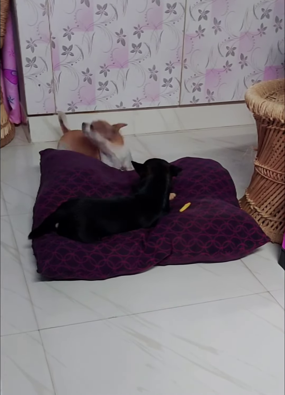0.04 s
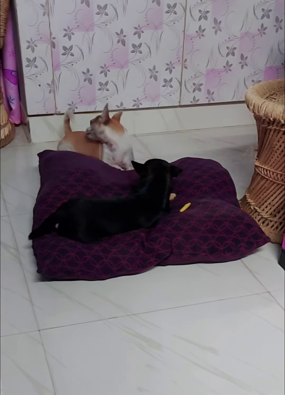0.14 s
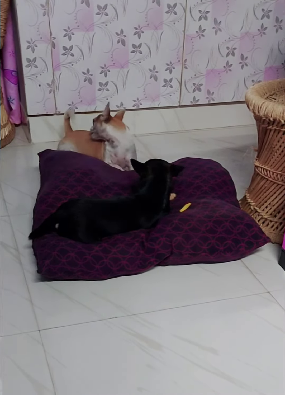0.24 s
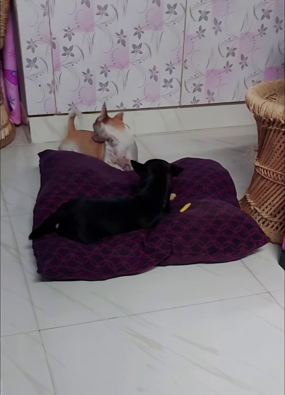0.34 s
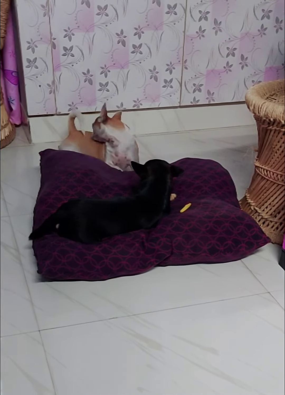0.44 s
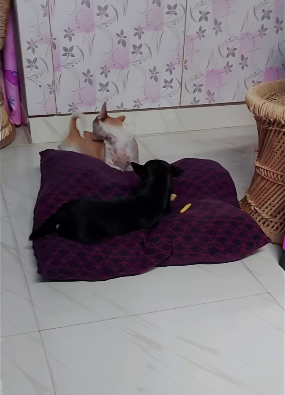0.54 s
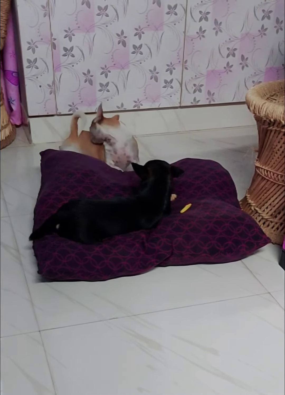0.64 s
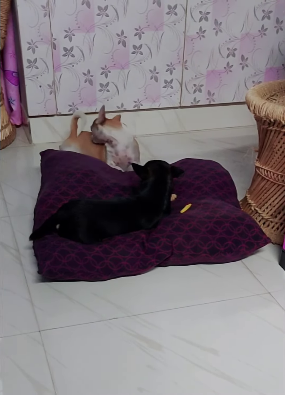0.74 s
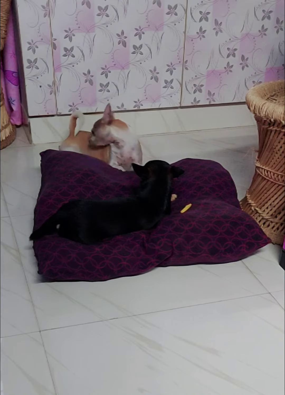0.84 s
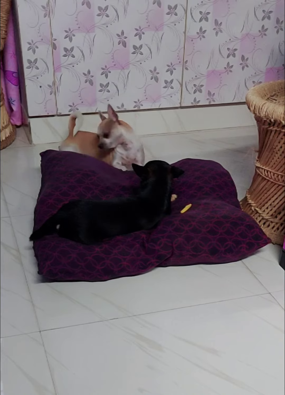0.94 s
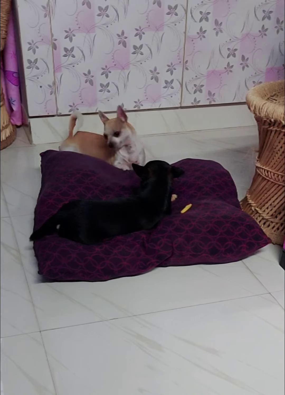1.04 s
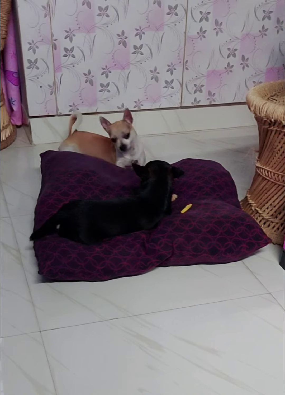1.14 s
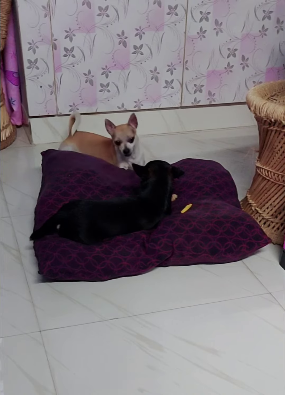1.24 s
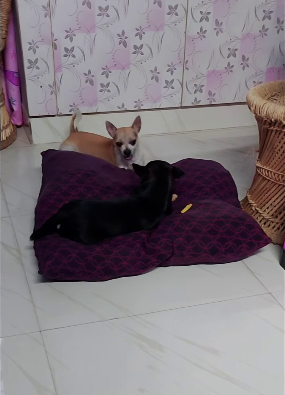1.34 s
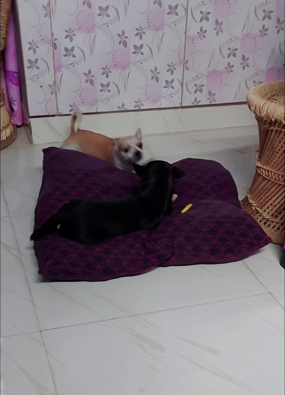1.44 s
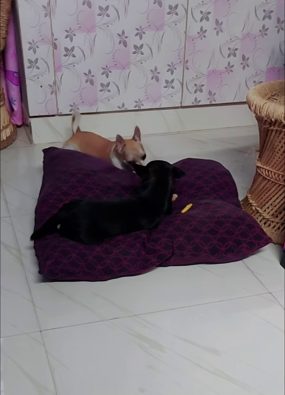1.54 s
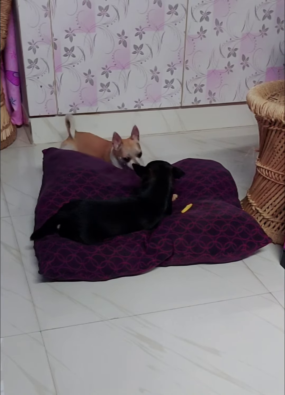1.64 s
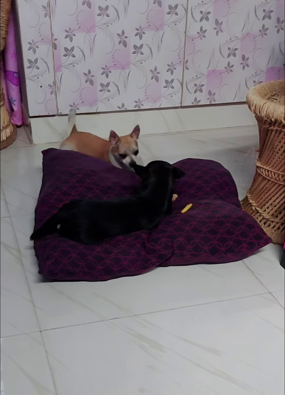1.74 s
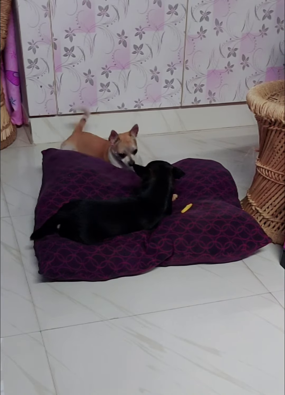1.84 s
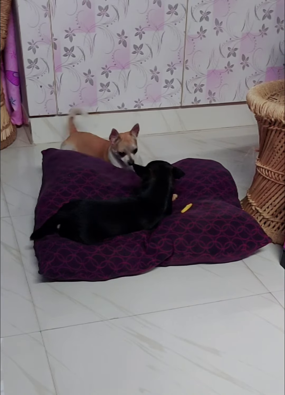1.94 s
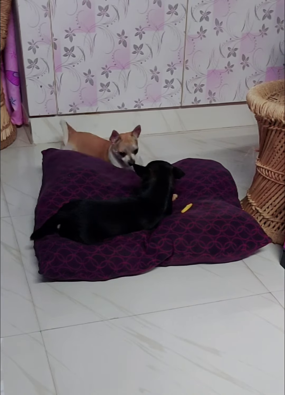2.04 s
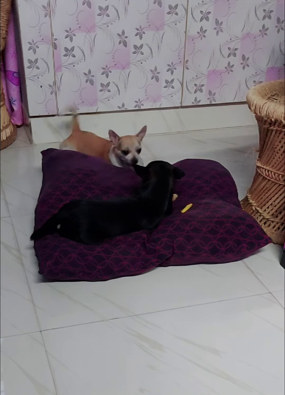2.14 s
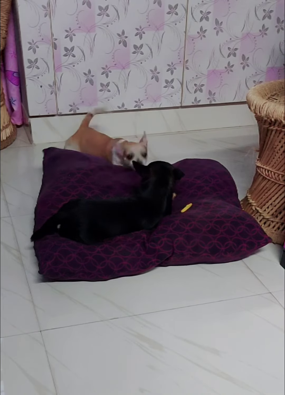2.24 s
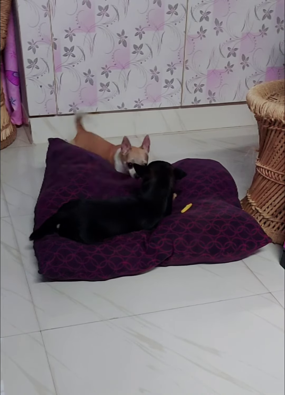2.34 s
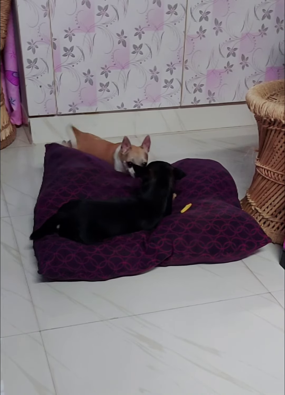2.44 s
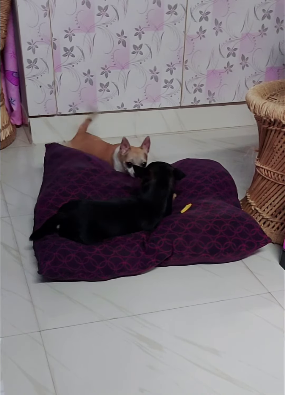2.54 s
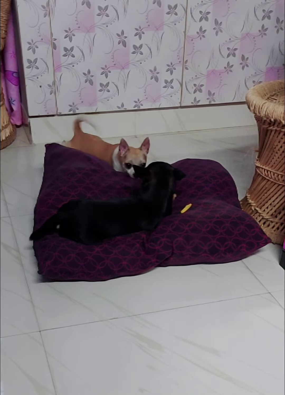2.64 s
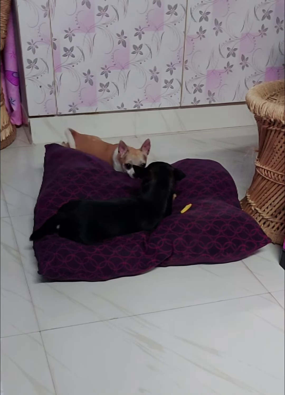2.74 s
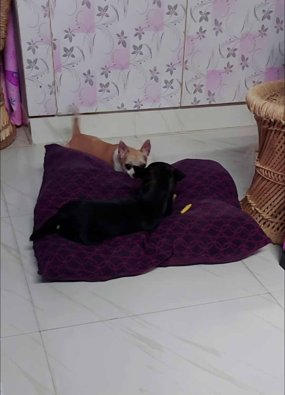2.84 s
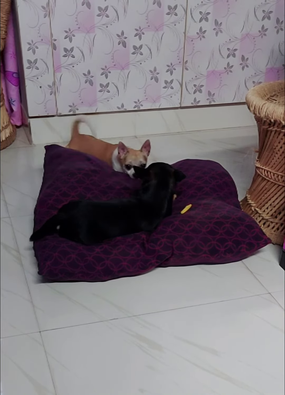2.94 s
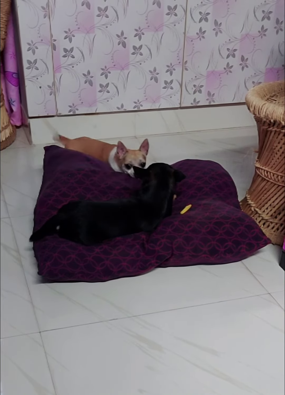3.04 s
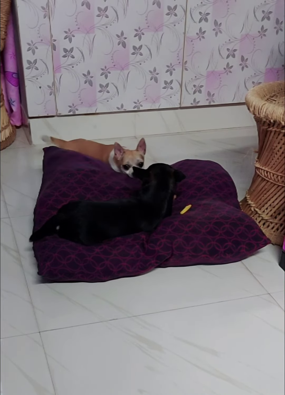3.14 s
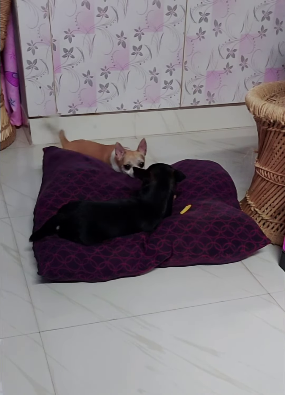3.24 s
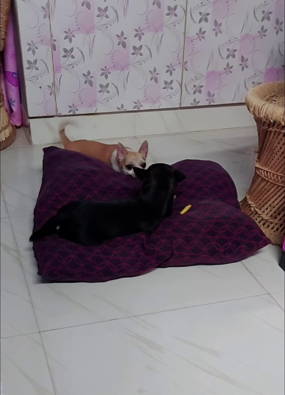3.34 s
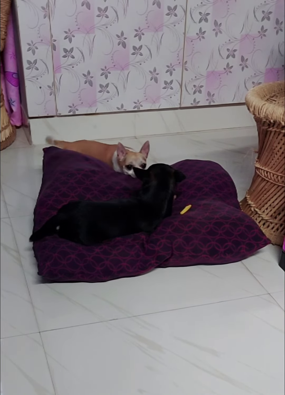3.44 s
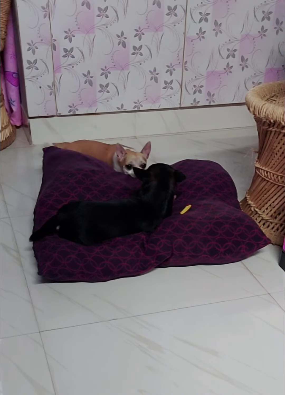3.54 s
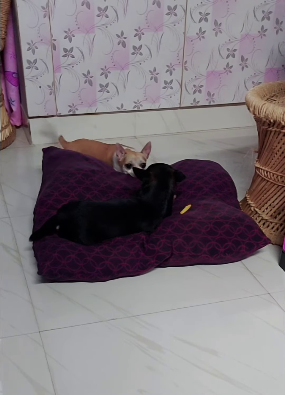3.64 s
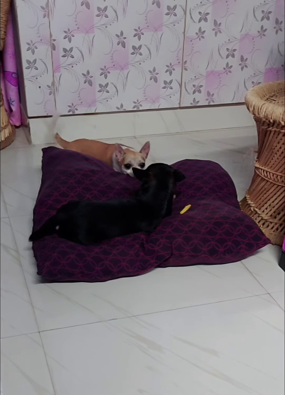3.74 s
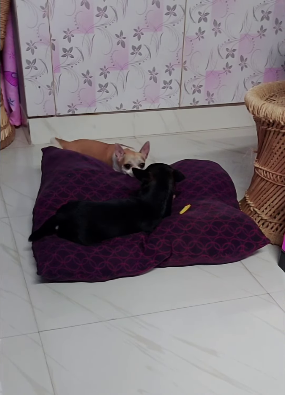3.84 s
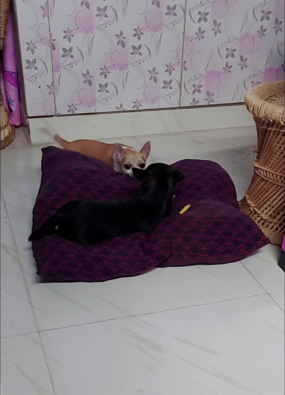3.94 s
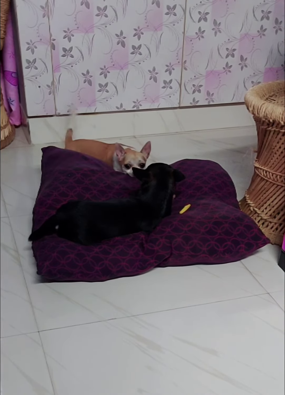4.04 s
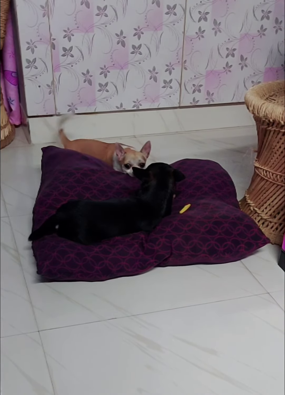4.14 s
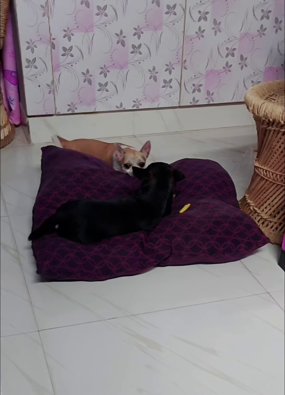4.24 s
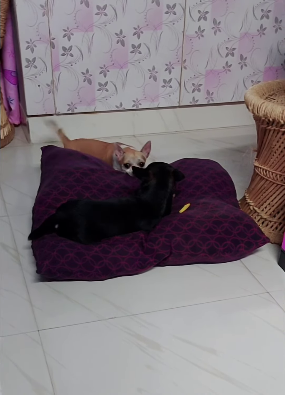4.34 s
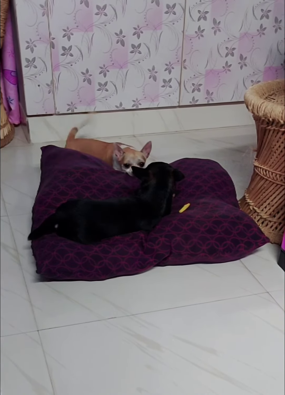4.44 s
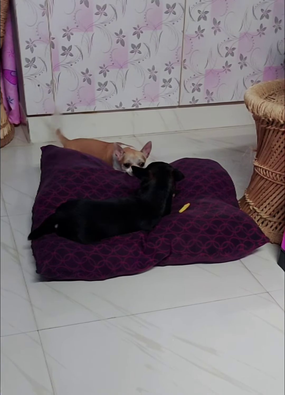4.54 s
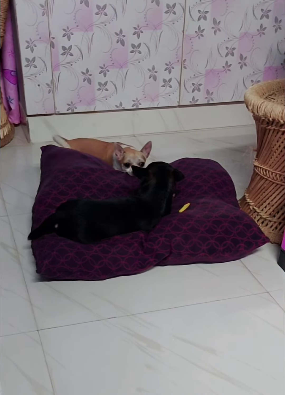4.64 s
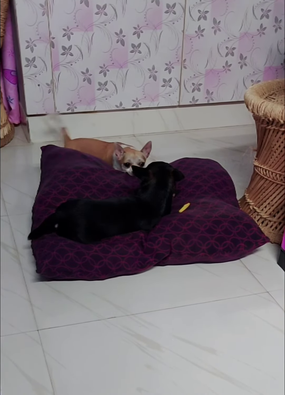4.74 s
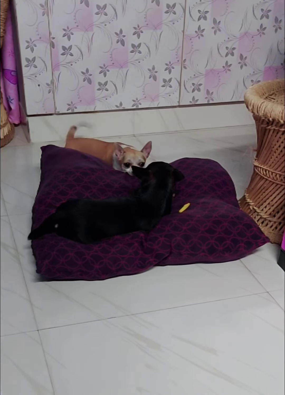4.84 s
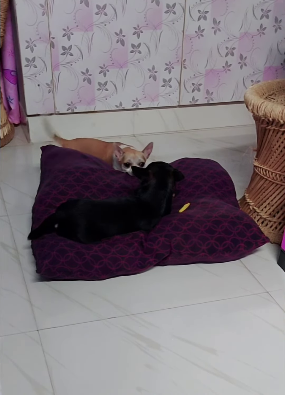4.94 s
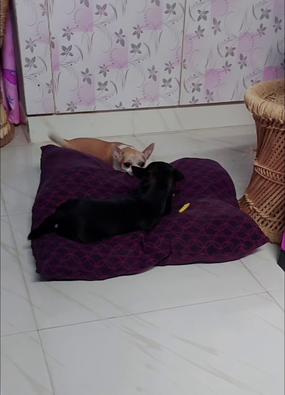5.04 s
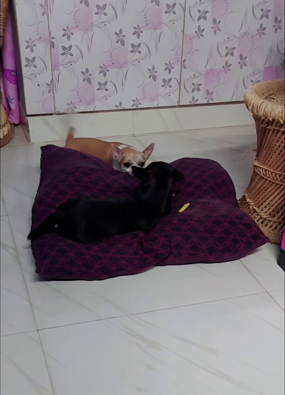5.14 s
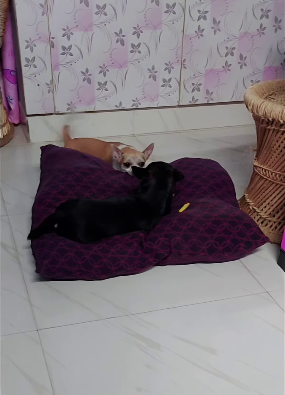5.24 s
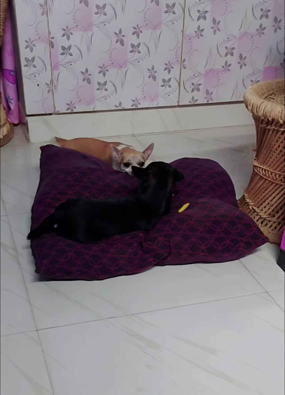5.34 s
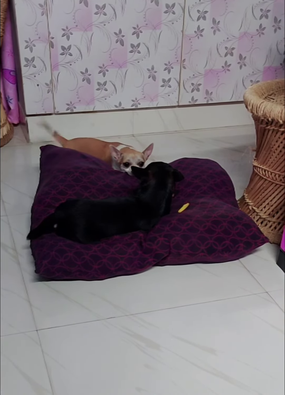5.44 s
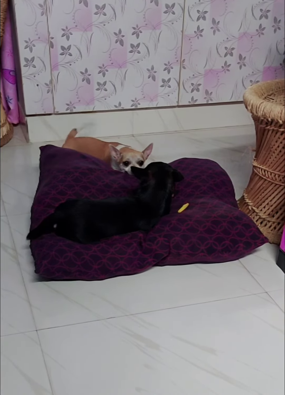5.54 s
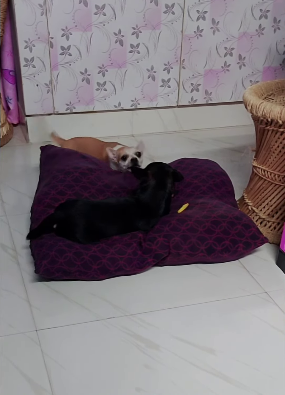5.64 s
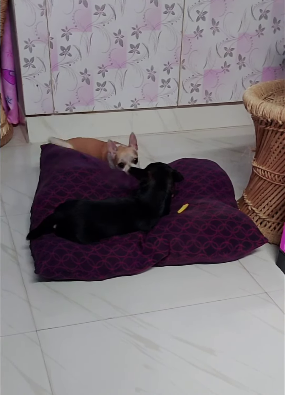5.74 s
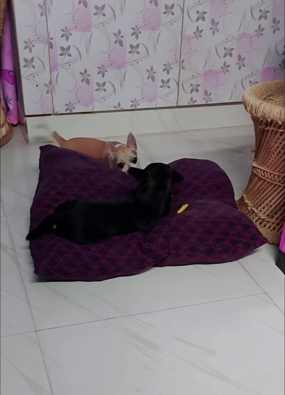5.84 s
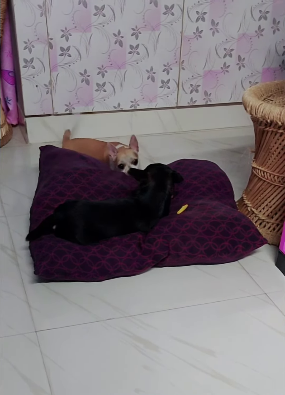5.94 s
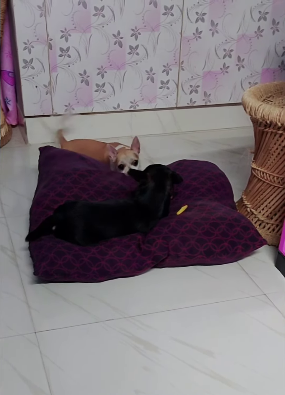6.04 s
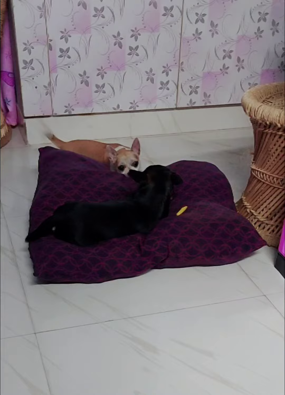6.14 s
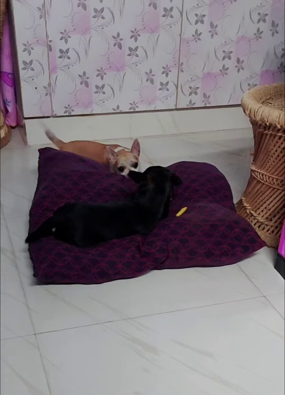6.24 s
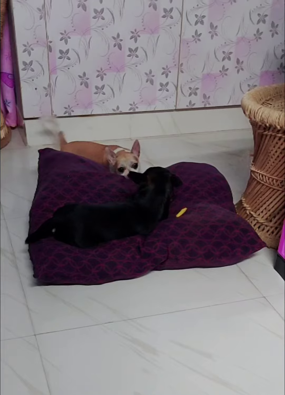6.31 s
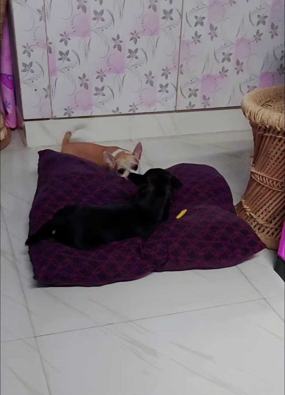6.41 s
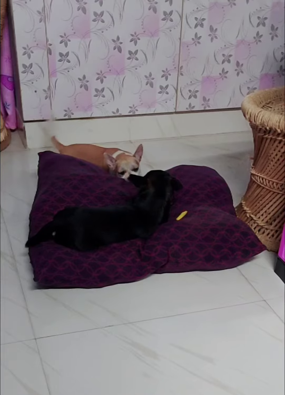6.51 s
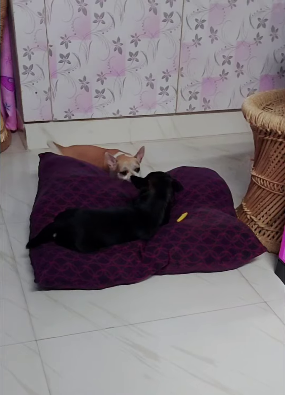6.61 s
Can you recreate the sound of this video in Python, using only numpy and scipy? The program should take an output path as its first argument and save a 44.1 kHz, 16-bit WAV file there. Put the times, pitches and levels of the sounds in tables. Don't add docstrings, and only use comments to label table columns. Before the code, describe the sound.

Over a steady whirring fan and low wind rumble, a little dog yaps shrilly three separate times, each yap ringing briefly off hard tiles.

```python
import sys
import numpy as np
from scipy import signal
from scipy.fft import rfft, irfft
from scipy.io import wavfile
from scipy.ndimage import uniform_filter1d, minimum_filter1d

SR = 44100
rng = np.random.default_rng(int(sys.argv[2]) if len(sys.argv) > 2 else 0)


def log_audio(samples):
    frames = np.atleast_2d(samples).T
    limited = np.clip(frames, -1, 1)
    pcm = np.round(limited * 32767).astype(np.int16)
    wavfile.write(sys.argv[1], SR, pcm)


def ratio_of_db(decibels):
    return 10 ** (np.asarray(decibels, float) / 20)


N = 294318
LONGEST = 8192
DUCK_S = 0.065

# (time [s], gain change [dB])
GAIN_STEPS = [
    (1.52, -5.5),
    (2.3, -2),
    (5.72, -2),
]


def rms_one(x):
    return x / np.sqrt(np.mean(x ** 2) + 1e-20)


def in_time(rows, at):
    s, *columns = np.transpose(rows)
    return [np.interp(at / SR, s, c) for c in columns]


def at_hz(points, hz):
    table_hz, value = np.array(points).T
    return np.interp(np.log(np.maximum(hz, 1)), np.log(table_hz), value)


def coloured(points, size):
    hz = np.fft.rfftfreq(size, 1 / SR)
    white = rfft(rng.standard_normal(size))
    return rms_one(irfft(white * ratio_of_db(at_hz(points, hz)), size))


def drift(rate_hz, size):
    settle = 20000
    r = np.exp(-2 * np.pi * rate_hz / SR)
    wander = signal.lfilter([1], [1, -2 * r, r * r], rng.standard_normal(size + settle))
    return rms_one(wander[settle:])


def yaps():
    # (time [s], pitch [Hz], level [dB])
    notes_sung = [
        [(1.449, 1760, -26.5), (1.472, 2223, -19.5), (1.495, 2470, -26.5)],
        [(1.474, 1480, -19.5), (1.49, 1544, -7.5), (1.497, 1572, -3.5), (1.512, 1560, -8.5)],
        [(1.503, 1766, -15), (1.524, 2040, -7.5), (1.546, 1980, -21)],
        [(2.228, 1470, -24), (2.246, 1588, -18.5), (2.2555, 1617, 2), (2.261, 1727, -10), (2.295, 1840, -23)],
        [(2.254, 2236, -26), (2.266, 2267, -7.5), (2.287, 2244, -4.5), (2.302, 2196, -8.5), (2.314, 1713, -8)],
        [(2.31, 1454, -14.5), (2.322, 1351, -14.5), (2.338, 1233, -21.5), (2.349, 1030, -27)],
        [(5.615, 1330, -44), (5.648, 1309, -38.5), (5.68, 1558, -8.5), (5.705, 1577, -3.5), (5.73, 1526, -14),
         (5.75, 1350, -16)],
        [(5.744, 1450, -15.5), (5.76, 1250, -38), (5.777, 984, -32)],
    ]
    roughness = [.45, .04, .1, .12, .3, .35, .03, .3]
    # (mouth opening on overtones [dB], half lines of strong-weak cycles [dB])
    registers = [(-18, -10.5), (-9, -56), (-1.5, -31), (-12, -39), (7, -59), (-11, -15), (-2.5, -60),
                 (7, -19)]
    # (multiple [x pitch], level [dB])
    overtones = [(1, 6), (2, -19.5), (3, -20.5), (4, -32), (5, -48.5), (6, -41), (7, -38.5), (8, -35),
                 (9, -37), (10, -29.5)]
    # (frequency [Hz], gain [dB])
    mouth = [(2500, 3), (3300, 3), (4700, -3), (5400, -8), (7000, -10.5), (8300, 11.5), (10000, -0.5),
             (13000, -1)]
    # (frequency [Hz], level [dB per Hz])
    rasp_colour = [(800, -38.5), (1200, -25), (2300, -8), (3000, -3), (4600, -13.5), (5100, -34),
                   (5700, -29), (7500, -35), (9000, -20), (10500, -29), (12500, -34), (15500, -27)]
    voice_db = -2.5
    soft_opens = 0.72

    out = np.zeros(N)
    for note, rough, (open_db, half_db) in zip(notes_sung, roughness, registers):
        at = np.arange(round(note[0][0] * SR), round(note[-1][0] * SR))
        size = len(at)
        hz, level_db = in_time(note, at)
        mouth_db = open_db + soft_opens * (level_db.max() - level_db)
        jitter = 1 + 0.08 * rough * drift(200, LONGEST)[:size]
        phase = 2 * np.pi * np.cumsum(hz * jitter) / SR
        effort_db = 0.5 * np.minimum(level_db + 3, 0) - 25 * rough

        tone = np.zeros(size)
        for k, db in overtones:
            harmonic_db = db + np.zeros(size)
            if k > 1:
                harmonic_db += at_hz(mouth, k * hz)
            if 1 < k < 4:
                harmonic_db += mouth_db
            if k > 2:
                harmonic_db += effort_db
            tone += ratio_of_db(harmonic_db) * np.sin(k * phase) * (k * hz < SR / 2)

        half_lines = ratio_of_db(0.5) * np.sin(phase / 2) + np.sin(3 * phase / 2) + ratio_of_db(-13) * np.sin(7 * phase / 2)
        tone += ratio_of_db(half_db) * half_lines
        tone *= ratio_of_db(9.7 * rough * drift(130, LONGEST)[:size])

        rasp = coloured(rasp_colour, LONGEST)[:size]
        rasp *= 1 + 0.8 * np.sin(phase)
        rasp *= ratio_of_db(5 * drift(150, LONGEST)[:size])
        fade = signal.windows.tukey(size, 0.15)
        out[at] += ratio_of_db(level_db + voice_db) * fade * (np.sqrt(2) * tone + 0.5 * rough * rasp)
    return signal.sosfilt(signal.butter(8, 900, "high", fs=SR, output="sos"), out)


def squeaks():
    # (time [s], length [s], level [dB])
    squeak_events = [
        (5.02, 0.055, -89),
        (5.193, 0.092, -86.5),
    ]
    # (frequency [Hz], level [dB])
    partials = [(5880, 6), (8800, -6), (13450, 2)]
    out = np.zeros(N)
    for start, length, level_db in squeak_events:
        s = np.arange(round(length * 1.5 * SR)) / SR
        shape = np.minimum(s / 0.011, 1) * ratio_of_db(-14 * (s / length) ** 2)
        tones = 0
        for hz, db in partials:
            waver_db = 3 * drift(40, LONGEST)[:len(s)]
            tones = tones + ratio_of_db(db + waver_db) * np.sin(2 * np.pi * hz * s)
        out[round(start * SR):][:len(s)] += ratio_of_db(level_db + 15) * shape * tones
    return out


def rustles():
    # (time [s], peak level [dB], length [s])
    scuffs = [
        (.28, -61, .05),
        (1.25, -50.5, 0.048),
        (3.067, -61, .06),
        (3.2, -65, .08),
        (3.43, -56, .04),
        (4.72, -67, .02),
        (4.793, -62, .04),
    ]
    shape = 0
    for at, db, length in scuffs:
        since = np.maximum(np.arange(N) / SR - at, 0)
        shape = shape + ratio_of_db(db - 25 * since / length) * np.minimum(since / 0.0066, 1)
    cloth = [(600, -24), (1500, -5), (4500, 0.5), (6500, -3), (9000, -19), (15000, -12.5)]   # (Hz, dB)
    return shape * coloured(cloth, N)


def knock():
    s = np.arange(N) / SR
    rustle = coloured([(300, -19), (2000, 5.5), (4000, -6), (9000, -8.5), (15000, -31)], N)
    hollow = coloured([(340, -60), (420, -5.5), (480, 1), (560, -46.5)], N)
    ring_shape = np.exp(-(s / 0.058) ** 2) * np.minimum(s / 0.016 + 0.94, 1)
    return ratio_of_db(-39.5) * rustle * ratio_of_db(-60 * s / 0.41), ratio_of_db(-30) * hollow * ring_shape


def room(x):
    # (frequency [Hz], time to fall 60 dB [s])
    decay_times = [(1000, 0.3), (4000, 0.27), (8000, 0.27), (15000, 0.26)]
    room_db, near_db, shadow_db = -6.5, -10, -1.5
    dog_lag = 11
    early_db, early_s = 7.5, 0.0071

    s = np.arange(round(0.6 * SR)) / SR
    white = rng.standard_normal((2, len(s)))
    cloud = 0
    for low in 250 * 2.0 ** np.arange(6):
        octave = signal.butter(2, [low, 2 * low], "band", fs=SR, output="sos")
        cloud = cloud + signal.sosfilt(octave, white) * ratio_of_db(-60 * s / at_hz(decay_times, 1.3 * low))
    cloud = cloud * np.clip((s - 0.0005) / 0.0021, 0, 1) * ratio_of_db(early_db * np.exp(-s / early_s))
    cloud /= np.sqrt(np.sum(cloud ** 2, axis=1, keepdims=True))

    paths = ratio_of_db(room_db) * np.roll(cloud, dog_lag, axis=1)
    paths[[0, 1], [dog_lag, 0]] += ratio_of_db([near_db, near_db + shadow_db])
    colour = rfft(paths)
    broad = np.sqrt(uniform_filter1d(np.abs(colour) ** 2, size=100))
    paths = irfft(colour / broad)[:, :len(s) * 9 // 10]
    return signal.fftconvolve(x[None], paths, axes=1)[:, dog_lag:N + dog_lag]


def fan():
    # (frequency [Hz], level [dB per Hz])
    air_noise = [(200, -4), (300, 2), (480, 4.5), (620, -3.5), (800, -5), (1050, -3), (1500, -6),
                 (2300, -8.5), (3000, -13.5), (3800, -24), (5000, -32.5), (6000, -33), (8000, -43.5),
                 (15000, -50)]
    # (frequency [Hz], level [dB])
    whine = [(409.1, -63.5), (699.8, -63.5), (893.6, -57.5), (1518, -63), (2223, -64.5), (2304, -61),
             (2579, -71), (2826, -66), (3435, -78), (4204, -82.5)]
    # (frequency [Hz], likeness [0 to 1])
    likeness = [(200, 0.85), (400, 0.62), (800, 0.47), (2000, 0.45), (5000, 0.02), (12000, 0.037)]
    # (frequency [Hz], left over right [dB])
    tilt = [(300, 0.2), (900, 1), (1800, -6), (3500, -1.5), (7000, -6), (13000, -5.5)]
    port_lag = 17
    fan_db, hiss_db = -51.5, -68
    hiss_back_s, hiss_held_db = 3.07, -2.5

    hz = np.fft.rfftfreq(N, 1 / SR)
    power = ratio_of_db(2 * at_hz(air_noise, hz)) * np.minimum(hz / 170, 1) ** 4
    power = ratio_of_db(2 * 10.12) * power / power.sum()
    for line_hz, db in whine:
        hump = np.exp(-0.5 * ((hz - line_hz) / (3.5 + 0.0028 * line_hz)) ** 2)
        power += ratio_of_db(2 * (db + 56)) * hump / hump.sum()

    shared, left, right = rfft(rng.standard_normal((3, N))) * np.sqrt(power * N / 2)
    alike = np.clip(at_hz(likeness, hz), 0, 1)
    late = np.exp(-2j * np.pi * hz * port_lag / SR)
    common = shared * np.array([np.ones_like(late), late])
    ports = np.sqrt(alike) * common + np.sqrt(1 - alike) * np.array([left, right])
    ports = irfft(ports * ratio_of_db(at_hz(tilt, hz) / 2 * [[1], [-1]]), N)

    low = signal.sosfilt(signal.butter(2, 1000, fs=SR, output="sos"), ports)
    steady = (ports - low) * ratio_of_db(0.5 * drift(8, N))
    ports = low * ratio_of_db(2.25 * drift(19, N)) + steady

    top = signal.sosfilt(signal.butter(2, 4500, "high", fs=SR, output="sos"), ports)
    first_s = GAIN_STEPS[0][0]
    held_times = [first_s, first_s + DUCK_S, hiss_back_s, hiss_back_s + DUCK_S]
    held = np.interp(np.arange(N) / SR, held_times, [0, 1, 1, 0])
    duck_db = ducking()
    body_gain = ratio_of_db(fan_db + duck_db)
    hiss_gain = ratio_of_db(hiss_db + 0.72 * duck_db + hiss_held_db * held + 22.5)
    return (ports - top) * body_gain + top * hiss_gain


def ducking():
    recover_s = 3.06
    gain_db = 0
    for at, db in GAIN_STEPS:
        since = np.maximum(np.arange(N) / SR - at, 0)
        gain_db = gain_db + db * np.minimum(since / DUCK_S, 1) * np.exp(-since / recover_s)
    return gain_db


def draught():
    # (Hz, dB)
    buffet = [(20, -45), (45, -14), (75, 0), (130, -7), (200, -12.5), (320, -18), (700, -81.5), (2000, -79.5)]
    rumble = [(12, -50.5), (30, -4), (55, 2.5), (110, -12), (300, -48), (2000, -84.5)]
    lumps_db = 2.15 * drift(17, N)
    ports = []
    for gust_db in gusts():
        flutter_db = lumps_db + 3.55 * drift(33, N)
        buffeting = ratio_of_db(gust_db - 6 + flutter_db) * coloured(buffet, N)
        rumbling = ratio_of_db(-58 + 1.7 * drift(1.2, N)) * coloured(rumble, N)
        ports.append(buffeting + rumbling)
    return np.array(ports)


def gusts():
    # (centre time [s], half length [s], level [dB], left over right [dB])
    puffs = [(0.167, 0.051, -41, 9), (0.507, 0.082, -51, 22), (0.885, 0.15, -56, 20), (1.41, .05, -53, 16),
             (1.9, 0.32, -64, 21), (2.401, 0.047, -45, 11), (2.658, 0.044, -37.5, 8),
             (3.21, 0.081, -38.5, 3), (3.44, 0.067, -39, 2), (3.627, 0.12, -36.5, 1.5),
             (3.776, 0.074, -33.5, -2), (3.985, 0.06, -42, -2), (4.358, 0.17, -40.5, 2),
             (4.897, 0.18, -36, 0), (5.076, 0.07, -44, -3), (5.33, 0.23, -39.5, 0), (5.65, 0.06, -46, 0),
             (6.015, 0.23, -36, 5.5), (6.141, 0.036, -30.5, 2), (6.27, 0.058, -31.5, -2),
             (6.57, 0.15, -37.5, 2.5)]
    fall_db, calm_db = 9, -72.5
    power = ratio_of_db(2 * calm_db)
    for centre, half, db, pan_db in puffs:
        away = (np.arange(N) / SR - centre) / half
        bell_db = db - fall_db * np.minimum(away ** 2, 10)
        power = power + ratio_of_db(2 * (bell_db + pan_db / 2 * np.array([[1], [-1]])))
    return 10 * np.log10(power)


def scene():
    rustle, hollow = knock()
    in_room = room(yaps() + squeaks() + rustles())
    blow = np.array([rustle, np.roll(rustle, 40)]) + hollow
    return in_room + blow + fan() + draught()


def roll_off(x):
    return signal.sosfilt(signal.butter(12, 15770, fs=SR, output="sos"), x)


def record(dry):
    peak_db = 20 * np.log10(np.abs(dry).max(axis=0) + 1e-9)
    over_db = np.maximum(peak_db + 0.5, 0)
    fall = 250 * np.arange(N) / SR
    held_db = np.maximum.accumulate(over_db + fall) - fall
    held_db = uniform_filter1d(-minimum_filter1d(-held_db, size=65), size=65)
    top_cut = signal.cheby2(12, 60, 16150, fs=SR, output="sos")
    mix = signal.sosfilt(top_cut, dry * ratio_of_db(-held_db))
    return roll_off(mix)


dry = scene()
out = record(dry)
log_audio(out)
```